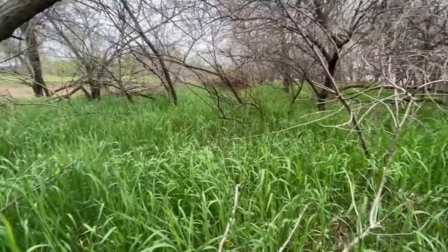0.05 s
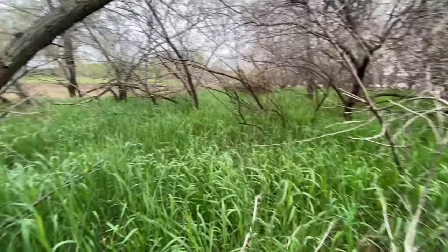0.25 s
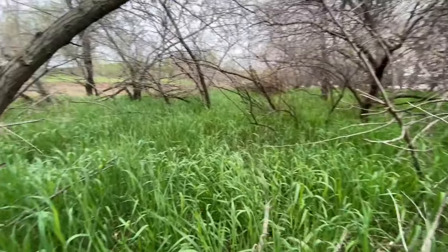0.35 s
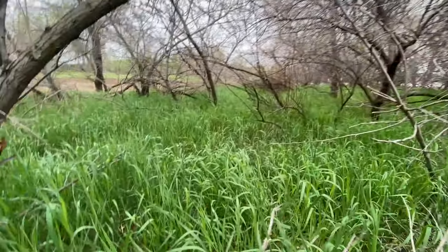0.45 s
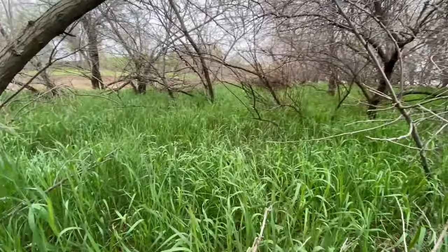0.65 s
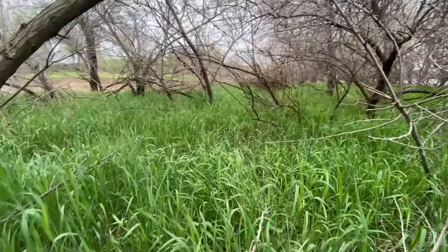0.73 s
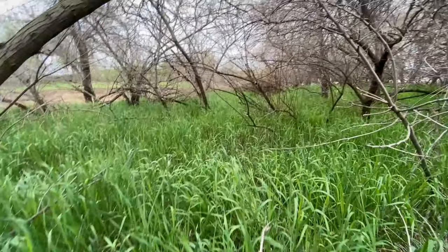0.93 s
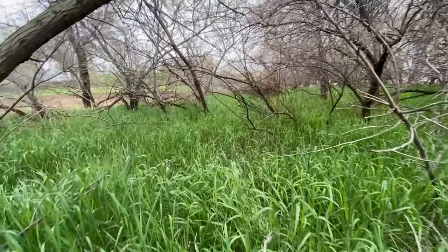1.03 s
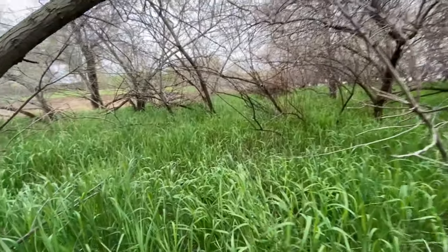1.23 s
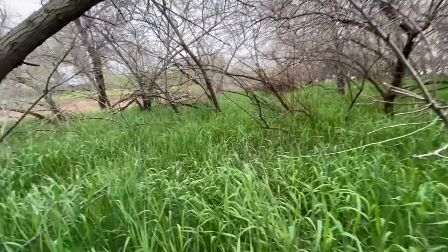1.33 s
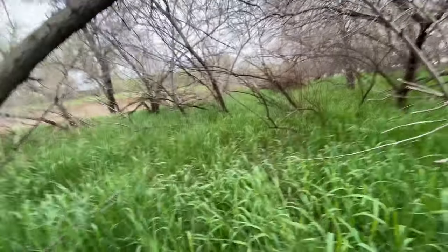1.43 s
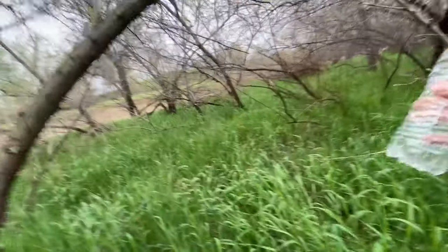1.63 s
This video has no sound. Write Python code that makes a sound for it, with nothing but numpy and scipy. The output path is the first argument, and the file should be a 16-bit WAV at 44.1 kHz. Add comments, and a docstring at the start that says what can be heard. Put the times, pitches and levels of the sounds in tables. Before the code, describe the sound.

Dry twigs snap underfoot in tall grass, close and without echo. Faint ticks lead to a sharp cluster at 0.2-0.5 s, ending in a heavy thump that overloads the left side. A deep drone swells until 0.8 s over low hum and soft rustle, with one faint snap near 0.77. A second, denser crackle runs 1.05-1.4 s with swishing blades, then thins to light rustle and dull taps by 1.65.

```python
"""Dry twigs snap in clusters, close up, under two footsteps through tall grass and brush.
Each snap is a spike, tearing noise, a short stem ring and a scattered tail. Dull knocks are tones that
fall in pitch inside thuds of noise; the heaviest overloads the left microphone. Blades swish as ticks
over fluttering, filtered noise. A low hum and a swelling drone, wavering tones in narrow rumble, lie
under the first second."""
import sys
import numpy as np
from scipy import signal
from scipy.fft import rfft, irfft, next_fast_len
from scipy.io import wavfile
from scipy.ndimage import map_coordinates

SR = 44100
rng = np.random.default_rng(int(sys.argv[2]) if len(sys.argv) > 2 else 0)


def persist_wave(psi):
    """Save psi, clipped to +-1, as 16-bit WAV."""
    counts = np.round(np.clip(psi, -1, 1) * 32767).astype(np.int16)
    wavfile.write(sys.argv[1], SR, np.atleast_2d(counts).T)


N = 72765

# twig snaps, levels before the overall trim: (time [s], stem ring [Hz], then level [dB] in each snap band)
TWIG_SNAPS = [(0.0545, 2040, -34, -33, -35, -31, -39), (0.1147, 12600, -44, -46, -63, -52, -42),
              (0.226, 12100, -33, -54, -44, -49, -31.5), (0.2687, 8300, -41.5, -32, -26, -29, -27),
              (0.2746, 3250, -50, -44, -16.5, -10.5, -17), (0.2846, 1880, -52, -31.5, -30, -27, -30),
              (0.305, 890, -41, -34.5, -26, -31, -37), (0.3186, 980, -59, -28, -21.5, -22.5, -29),
              (0.4184, 7980, -39, -35.5, -26.5, -18.5, -15.5), (0.4441, 4290, -48, -26, -16, -16, -9.5),
              (0.456, 890, -50, -27.5, -31, -22, -24), (0.4907, 6710, -22, -23.5, -18, -11.5, -11),
              (0.4985, 6140, -21, -26.5, -16.5, -15, -22), (0.765, 1140, -30.5, -30.5, -37.5, -29.5, -32.5),
              (1.0095, 5080, -55, -51, -38.5, -26.5, -25.5), (1.0495, 1420, -30.5, -32.5, -40, -52, -51),
              (1.0752, 8360, -25.5, -19.5, -15.5, -14, -16), (1.089, 5400, -49, -24.5, -23, -18, -25),
              (1.0933, 1060, -29.5, -20.5, -16.5, -13, -21), (1.1216, 7930, -65, -43, -27, -21, -26),
              (1.1242, 1990, -41, -31, -23.5, -18, -23), (1.1512, 8400, -52, -49, -39, -40, -43),
              (1.1834, 850, -58, -37.5, -36.5, -37, -43), (1.188, 740, -46, -41, -38, -34, -42),
              (1.2057, 5030, -42, -34, -29.5, -19, -27.5), (1.241, 2460, -58, -33.5, -26, -28, -30),
              (1.257, 6650, -62, -39, -34, -30, -40), (1.2847, 6600, -30, -26.5, -20.5, -14.5, -28),
              (1.291, 1490, -38, -24.5, -20, -26, -45), (1.3137, 6230, -26.5, -26, -18.5, -18, -30),
              (1.3289, 4460, -32, -24.5, -18, -19.5, -27), (1.3448, 8800, -28.5, -21, -18, -14, -27),
              (1.346, 924, -43, -18, -20.5, -23, -28), (1.3778, 2670, -54, -51, -36, -34, -41),
              (1.3916, 1670, -61, -38.5, -31, -26, -31.5), (1.4507, 2380, -51, -36.5, -30.5, -33, -30.5),
              (1.4847, 5360, -40.5, -53, -52, -42, -49)]
# frequency bands of a snap: (low edge [Hz], high edge [Hz])
SNAP_BANDS = [(180, 600), (600, 2000), (2000, 5000), (5000, 9500), (9500, 17500)]
# how fast the tearing fibres die away: one (decay [s]) per snap band
BREAK_DECAY_S = [0.0041, 0.005, 0.0019, 0.0016, 0.00044]
# the snap scattered by ground and stems, against the break's envelope: one (level [dB]) per snap band
SCATTER_DB = [-14, -10.5, -12.5, -9, -10]
SCATTER_DECAY_S = 0.0063
# the fibres give over two attack times, then part at once in a spike
ATTACK_S, SPIKE_S, SPIKE_DB = 0.0005, 0.000093, 4
SNAP_TRIM_DB = -0.5
SNAP_SHARED_POWER = 0.061  # noise common to both sides, against each side's own
# stem ring against its band; its decay is a base time plus a few cycles
RING_DB, RING_BASE_S, RING_CYCLES = -3.5, 0.0011, 1.5

# dull knocks, level before the envelope: (time [s], level [dB], start pitch [Hz], end pitch [Hz],
# glide [s], decay [s], left minus right [dB], thud against tone [dB])
DULL_KNOCKS = [(0.2128, -13, 734, 387, 0.0061, 0.0039, -4.5, -4),
               (0.219, -23, 300, 130, 0.0087, .007, 2, -12), (0.5003, 2, 704, 47.3, 0.004, 0.0079, 21, -17),
               (.602, -36.5, 235, 120, .02, 0.0041, 29, -2.5),
               (1.048, -26.5, 820, 280, 0.0074, 0.0049, -5, 0),
               (1.0762, -14.5, 560, 76, 0.0061, 0.0067, 5, -1),
               (1.094, -26.5, 296, 100, 0.013, 0.011, 17, -2),
               (1.289, -32, 375, 191, 0.0068, 0.005, -5, -0.5),
               (1.347, -26.5, 450, 69.4, 0.011, 0.011, 3, 0),
               (1.568, -25, 420, 200, 0.0077, 0.0068, -8, -5.5),
               (1.643, -29, 525, 350, .01, 0.0034, -6, -8)]
KNOCK_RISE_S, THUD_TOP_HZ = 0.0024, 520  # the thud is noise below this edge

# grass rustle: (time [s], low brushing level [dB], swish level [dB], finest hiss level [dB])
RUSTLE_LEVELS = [(0, -38.5, -46.5, -57), (.08, -40, -41.5, -54), (.15, -43.5, -48, -45.5),
                 (.2, -40.5, -40, -38), (.27, -36.5, -32.5, -34), (.32, -31.5, -30.5, -36),
                 (.37, -41, -40, -40.5), (.45, -34, -31.5, -36), (.5, -35, -32.5, -34),
                 (.53, -63, -44, -49), (.59, -54.5, -56.5, -62), (.7, -44.5, -49, -51),
                 (.79, -41, -44, -46.5), (.97, -42.5, -49.5, -55.5), (1.06, -37, -42.5, -47),
                 (1.105, -50, -34, -37), (1.168, -56, -48, -57), (1.22, -48.5, -39.5, -37.5),
                 (1.272, -44, -40.5, -63), (1.36, -37.5, -31.5, -45), (1.425, -52, -52, -61),
                 (1.48, -47.5, -48, -57), (1.55, -38, -49, -53.5), (1.65, -46.5, -50, -56)]
# tone of each rustle layer, relative only: (frequency [Hz], noise density [dB])
BRUSHING_SPECTRUM = [(30, -11), (120, 5.5), (250, 3), (500, 5), (1000, 0.5), (1800, -5.5), (3500, -19.5),
                     (8000, -52)]
SWISH_SPECTRUM = [(500, -48), (1400, 0), (2400, 1.5), (4500, 2.5), (8000, 0.5), (9500, -1), (12000, -20),
                  (16000, -22)]
HISS_SPECTRUM = [(5000, -24), (8500, -8), (10500, 2.5), (12300, -2.5), (13500, 5.5), (15500, -6)]
# how alike the rustle is on both sides: (frequency [Hz], left-right correlation [-1 to 1])
STEREO_LIKENESS = [(60, 0.26), (150, 0.8), (300, 0.31), (640, -0.63), (1500, -0.14), (8000, -0.038),
                   (15000, 1)]
# blades and stems flicking past each other; the share is of the rustle's power
TICKS_PER_S, TICK_SPREAD_DB, TICK_SHARE = 900, 1, 0.27

# low hum: (time [s], level [dB])
HUM_LEVEL = [(0, -38), (.3, -40.5), (.48, -41.5), (.58, -55), (.7, -44), (.8, -44.5), (1.08, -42.5),
             (1.2, -70), (1.65, -74)]
# deeper drone that swells after the heavy knock: (time [s], level [dB])
DRONE_LEVEL = [(0, -48), (.48, -51), (.53, -21), (.585, -41.5), (.66, -25.5), (.74, -31.5), (.785, -43),
               (1, -44.5), (1.2, -68), (1.65, -67)]
HUM_HZ, DRONE_HZ = 88.6, 47.3
HUM_PAN_DB, DRONE_PAN_DB = 1, 12  # left minus right
RUMBLE_OCTAVES = 0.63  # width of the rumble around each tone

# colour common to both microphones: (frequency [Hz], gain [dB])
MIC_COLOUR = [(100, 0), (700, -2), (1050, 1), (1400, -1.5), (3000, 0.5), (6000, -1), (7200, 3), (8500, 1),
              (9800, 0), (11200, 3), (15500, -2.5)]
# the left microphone's lead over the right: (frequency [Hz], left minus right [dB])
MIC_BALANCE = [(100, 1.5), (500, -1.5), (1050, 0), (1900, 2), (5000, 4.5), (6600, 6), (7400, 0), (8600, -6),
               (9800, 0.5), (10800, -0.5)]
# crossfade into shared treble: (start [Hz], end [Hz])
SHARED_TREBLE_HZ = (8800, 10800)
TREBLE_LAG_S, TOP_HZ = 0.000264, 15900


def amp(db):
    """Decibels to gain."""
    return 10 ** (np.asarray(db) / 20)


def unit(x):
    """Scale to rms 1."""
    return x / np.sqrt(np.mean(x ** 2) + 1e-20)


def pan(db):
    """Left and right gains, mean power 1, for a level difference."""
    return unit(amp(np.array([[db], [-db]]) / 2))


def along(points, hz):
    """Read (frequency, value) points on a log frequency axis."""
    point_hz, values = np.transpose(points)
    return np.interp(np.log(hz + 1), np.log(point_hz + 1), values)


def curves(rows):
    """One value per sample for each column after the time."""
    times, *columns = np.transpose(rows)
    return [np.interp(np.arange(N) / SR, times, column) for column in columns]


def wobble(rate):
    """A smooth random curve, rate knots a second."""
    knots = rng.standard_normal(int(N * rate / SR) + 4)
    return map_coordinates(knots, [np.arange(N) * rate / SR])


def filtered(x, response):
    """Shape a sound's spectrum with a response given as a function of frequency."""
    size = next_fast_len(N + SR // 2)
    spectrum = rfft(x, size) * response(np.fft.rfftfreq(size, 1 / SR))
    return irfft(spectrum, size)[..., :N]


def add(out, time, sound):
    """Mix a sound in at a time in seconds."""
    start = max(round(time * SR), 0)
    out[:, start:start + sound.shape[1]] += sound[:, :max(N - start, 0)]


def level_snap(x):
    """Give each side the energy of 6 ms at rms 1, so short and long parts take levels alike."""
    return x * np.sqrt(0.006 * SR / np.sum(x ** 2, axis=1, keepdims=True))


def twigs():
    """Fibres tear and part in a spike, the freed stem rings briefly and the snap scatters into a tail."""
    out, t = np.zeros((2, N)), np.arange(SR // 10) / SR
    filters = [signal.butter(3, band, 'band', fs=SR, output='sos') for band in SNAP_BANDS]
    band_centres = np.mean(SNAP_BANDS, axis=1)
    parting_s = 2 * ATTACK_S
    after = np.maximum(t - parting_s, 0)
    rise = np.minimum(t / parting_s, 1) ** 2
    spike = amp(SPIKE_DB) * np.exp(-abs(t - parting_s) / SPIKE_S)
    scatter = np.exp(-after / SCATTER_DECAY_S)
    for time, ring_hz, *levels in TWIG_SNAPS:
        noise = rng.standard_normal((3, len(t)))
        fibres = noise[:2] + np.sqrt(SNAP_SHARED_POWER) * noise[2]
        # each side rings from its own random phase
        ring = np.sin(2 * np.pi * (ring_hz * t + rng.random((2, 1))))
        ring = ring * rise * np.exp(-after / (RING_BASE_S + RING_CYCLES / ring_hz))
        ring_db = RING_DB + along(np.c_[band_centres, levels], ring_hz)
        snap = amp(ring_db) * level_snap(ring)
        for sos, db, decay, scatter_db in zip(filters, levels, BREAK_DECAY_S, SCATTER_DB):
            tail = np.exp(-after / decay) + amp(scatter_db) * scatter
            tearing = fibres * (rise * tail + spike)
            snap += amp(db) * level_snap(signal.sosfilt(sos, tearing))
        add(out, time - ATTACK_S, amp(SNAP_TRIM_DB) * snap)
    return out


def knocks():
    """Dull thumps: a tone whose pitch drops as it dies, in a low thud of noise."""
    out, t = np.zeros((2, N)), np.arange(SR // 5) / SR
    dull = signal.butter(3, THUD_TOP_HZ, fs=SR, output='sos')
    for time, db, start_hz, end_hz, glide, decay, side_db, thud_db in DULL_KNOCKS:
        hz = end_hz + (start_hz - end_hz) / (1 + t / glide) ** 2
        tone = unit(np.sin(2 * np.pi * np.cumsum(hz) / SR))
        thud = unit(signal.sosfilt(dull, rng.standard_normal((2, len(t)))))
        shape = (1 - np.exp(-t / KNOCK_RISE_S)) * np.exp(-t / decay)
        add(out, time, amp(db) * pan(side_db) * shape * (tone + amp(thud_db) * thud))
    return out


def blades(spectrum, flutter_db):
    """Stereo rustle of rms 1: tiny ticks over a bed of friction noise, fluttering together."""
    sizes = amp(TICK_SPREAD_DB * np.minimum(rng.exponential(size=N), 4))
    struck = rng.random(N) < TICKS_PER_S / SR
    ticks = unit(struck * sizes * rng.standard_normal((2, N)))
    friction = rng.standard_normal((2, N))
    pair = np.sqrt(TICK_SHARE) * ticks + np.sqrt(1 - TICK_SHARE) * friction

    def mid_side(hz):
        # this split of mid and side gives the wanted left-right correlation
        angle = np.arccos(np.clip(along(STEREO_LIKENESS, hz), -1, 1)) / 2
        return amp(along(spectrum, hz)) * [np.cos(angle), np.sin(angle)]

    mid, side = filtered(pair, mid_side)
    stereo = np.array([mid + side, mid - side])
    return unit(stereo * amp(flutter_db * wobble(110)))


def grass():
    """Legs push through the blades: low brushing, swish and fine hiss, each on its own level curve."""
    brushing_db, swish_db, hiss_db = curves(RUSTLE_LEVELS)
    brushing = amp(brushing_db) * blades(BRUSHING_SPECTRUM, flutter_db=2)
    swish = amp(swish_db) * blades(SWISH_SPECTRUM, flutter_db=1.5)
    hiss = amp(hiss_db) * blades(HISS_SPECTRUM, flutter_db=1)
    return brushing + swish + hiss


def hum(levels, hz, side_db, waver, rumble_db):
    """A low tone whose phase wavers (scale in radians), inside a narrow rumble of noise."""
    level_db, = curves(levels)
    tone = unit(np.sin(2 * np.pi * hz * np.arange(N) / SR + waver * wobble(14.2)))

    def around_tone(f):
        return np.exp(-(np.log2((f + 1) / hz) / RUMBLE_OCTAVES) ** 2)

    rumble = unit(filtered(rng.standard_normal(N), around_tone))
    return amp(level_db) * pan(side_db) * unit(tone + amp(rumble_db) * rumble)


def scene():
    """Everything is close and in the open air: the layers are summed with no room."""
    low_hum = hum(HUM_LEVEL, HUM_HZ, HUM_PAN_DB, waver=0.15, rumble_db=-8.5)
    drone = hum(DRONE_LEVEL, DRONE_HZ, DRONE_PAN_DB, waver=0.2, rumble_db=-14)
    return twigs() + knocks() + grass() + low_hum + drone


def record(dry):
    """Microphones colour each side, the right takes its highest treble late from the left; peaks clip."""
    def blend(hz):
        return np.interp(hz, SHARED_TREBLE_HZ, [0, np.pi / 2])

    def late_treble(hz):
        return np.sin(blend(hz)) * np.exp(-2j * np.pi * hz * TREBLE_LAG_S)

    def colour(hz):
        lead_db = along(MIC_BALANCE, hz) * np.array([[0.5], [-0.5]])
        return amp(along(MIC_COLOUR, hz) + lead_db)

    left, right = dry
    right = filtered(right, lambda hz: np.cos(blend(hz))) + filtered(left, late_treble)
    pair = filtered(np.array([left, right]), colour)
    return filtered(np.clip(pair, -1, 1), lambda hz: hz < TOP_HZ)


dry = scene()
out = record(dry)
persist_wave(out)
```